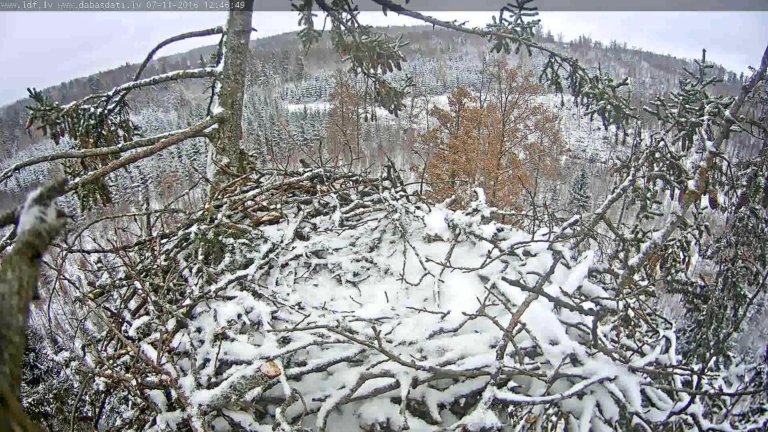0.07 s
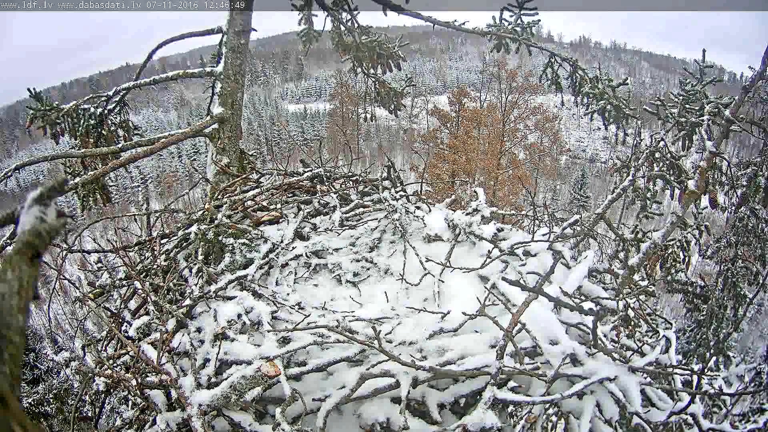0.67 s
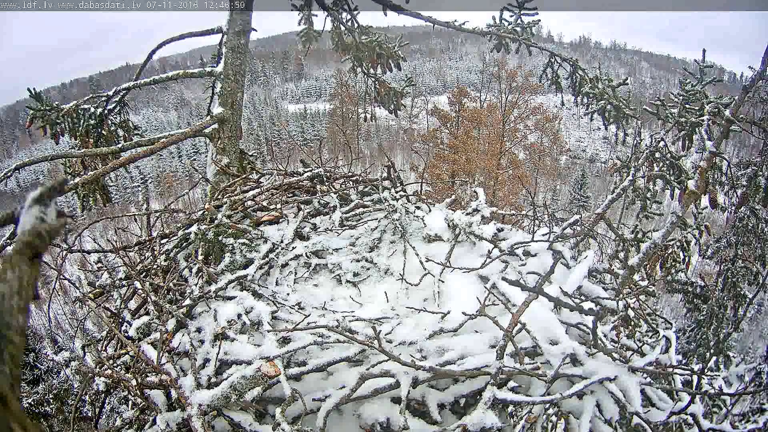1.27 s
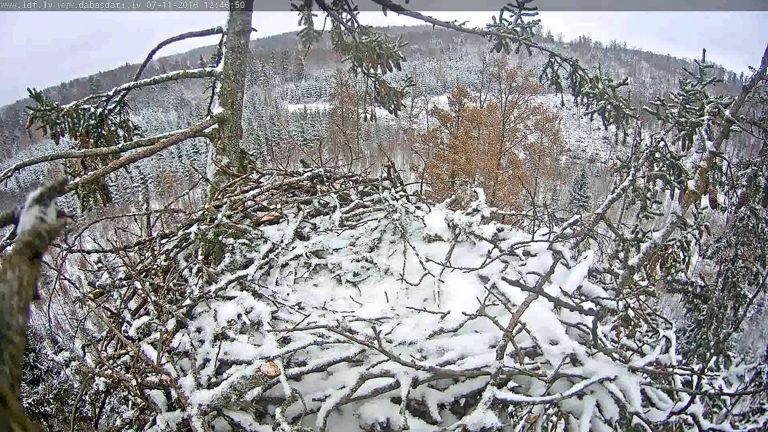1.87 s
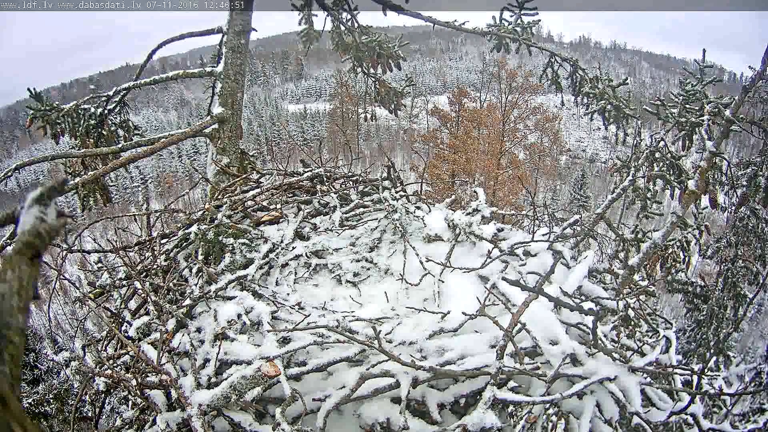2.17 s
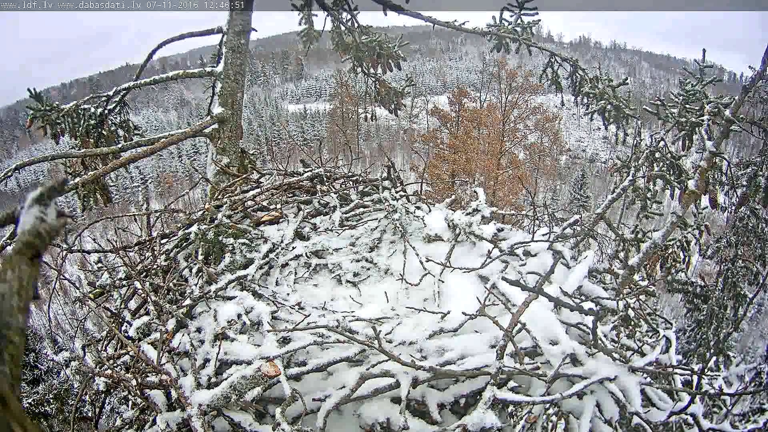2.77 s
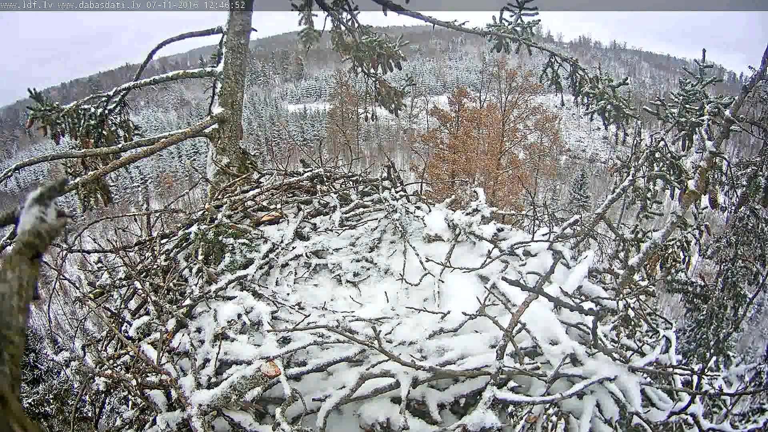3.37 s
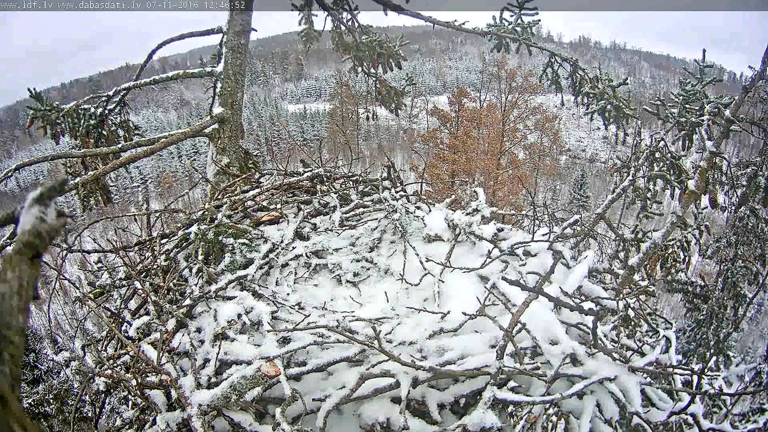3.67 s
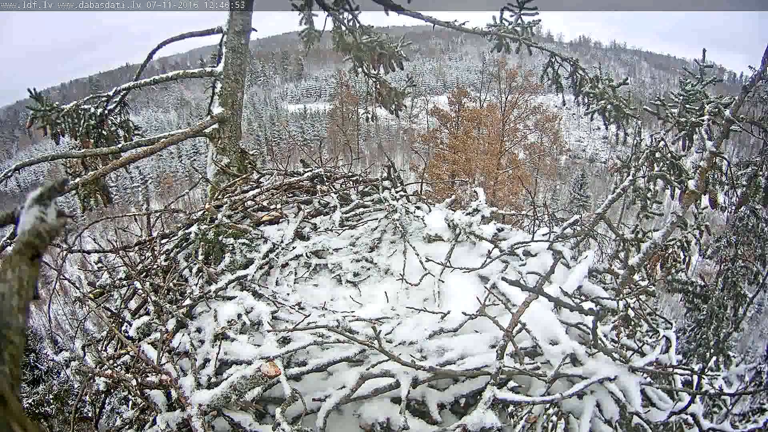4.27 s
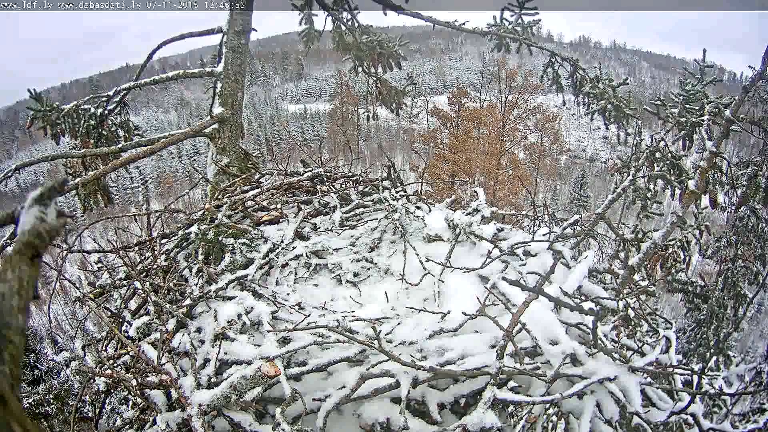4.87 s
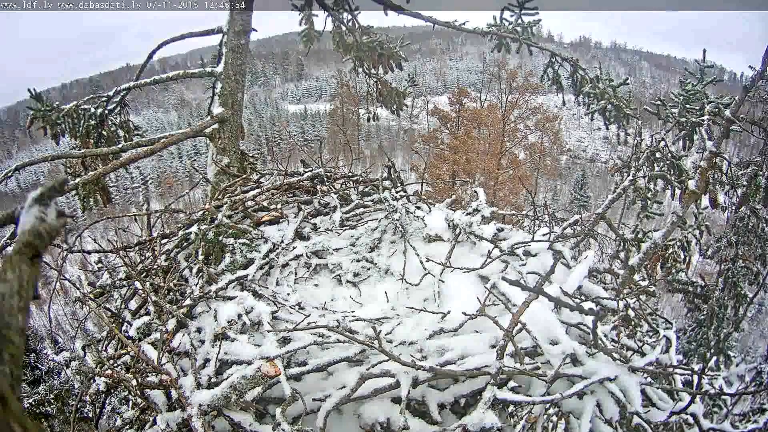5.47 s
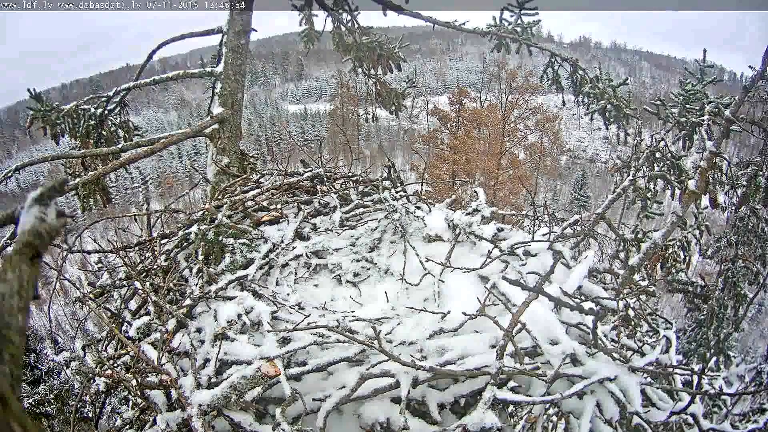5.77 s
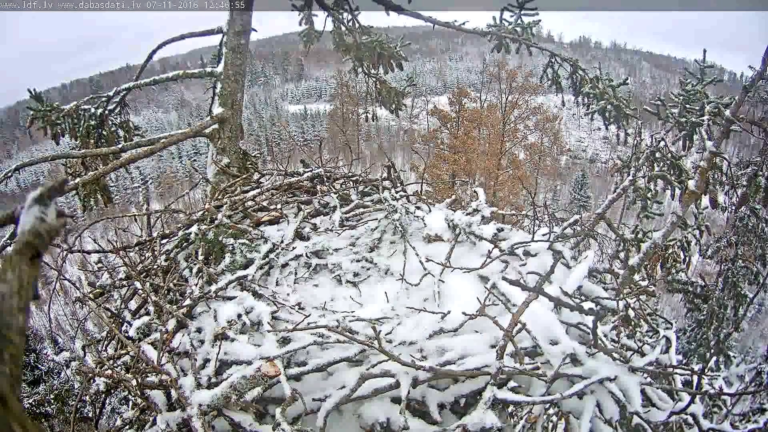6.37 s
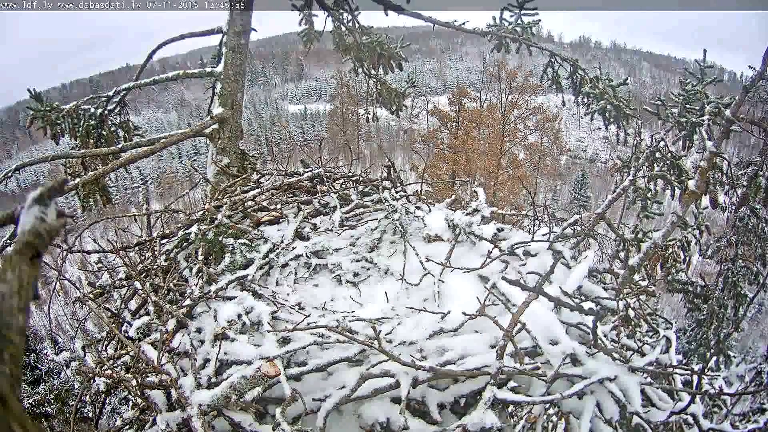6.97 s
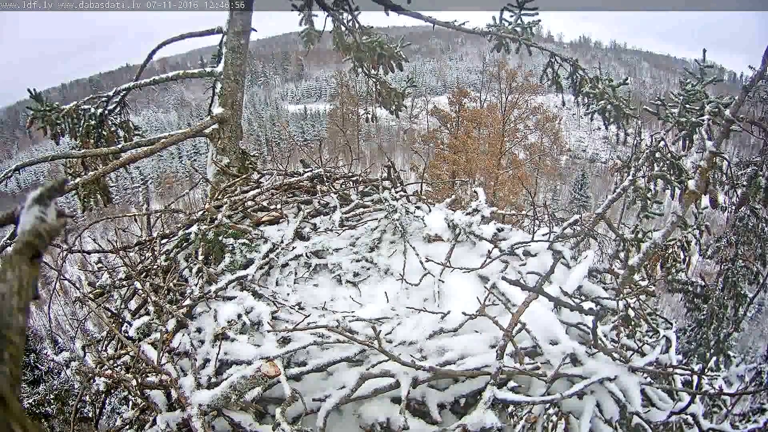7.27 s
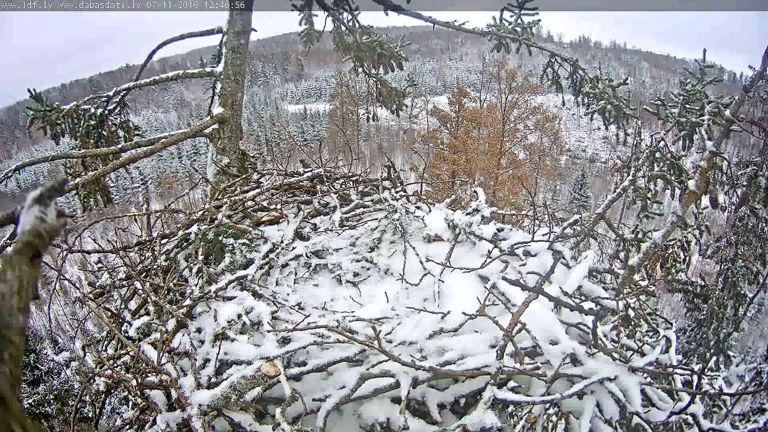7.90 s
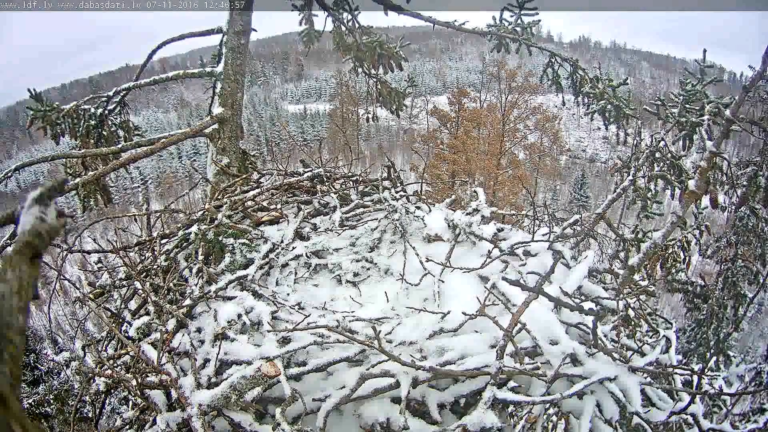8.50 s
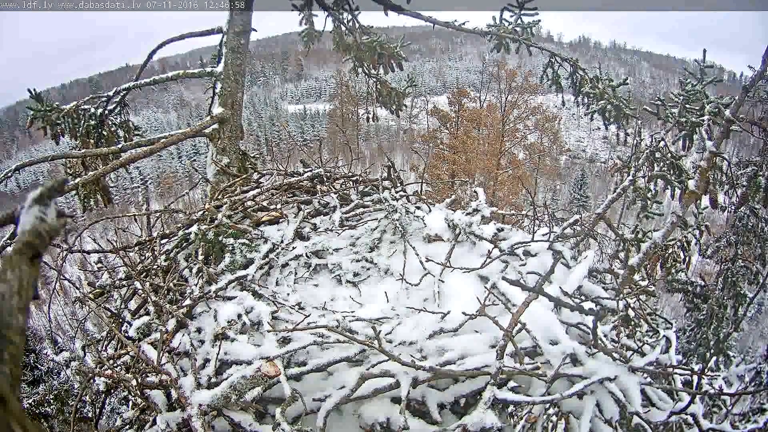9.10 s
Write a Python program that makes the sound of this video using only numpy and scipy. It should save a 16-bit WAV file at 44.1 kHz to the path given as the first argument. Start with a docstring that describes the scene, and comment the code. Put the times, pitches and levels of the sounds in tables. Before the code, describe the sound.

Fine snow patters and ticks on a microphone housing at a treetop nest, with small plops on nearby twigs. Light wind rumbles and thumps softly over a steady hiss with a faint whine. About three and a half seconds in, a distant buzzard mews once, a falling whistle that turns hoarse and echoes off the wooded slope. The wind then swells briefly and eases as the snow keeps ticking.

```python
"""Light wind rumbles, murmurs and thumps at a treetop nest, over a camera's hiss, flutter and faint whine.
Snow patters and ticks on the microphone housing and plops on twigs: each grain makes what it hits ring.
About 3.5 s in, a far-off buzzard mews once, a whistle that leaps up, sinks and turns hoarse.
The trees of the snowy slope throw the call back.
The camera turns weak bass down, and its gain control dips after loud peaks."""
import sys
import numpy as np
from scipy import signal
from scipy.fft import rfft, irfft
from scipy.io import wavfile
from scipy.ndimage import uniform_filter1d

SR = 44100
rng = np.random.default_rng(int(sys.argv[2]) if len(sys.argv) > 2 else 0)


def waveform_to_disk(signal):
    """Save audio, clipped to [-1, 1], as 16-bit WAV at the path in sys.argv[1]."""
    frames = np.transpose(np.atleast_2d(signal))
    scaled = np.clip(frames, -1, 1) * 32767
    samples = np.round(scaled).astype(np.int16)
    wavfile.write(sys.argv[1], SR, samples)


N = 407484
TIME = np.arange(N) / SR


def gain_of(db):
    """Turns decibels into a number to multiply by."""
    return 10 ** (np.asarray(db) / 20)


def unit_rms(x):
    """Scales x so that its average strength (rms) is 1."""
    return x / np.sqrt(np.mean(x ** 2) + 1e-20)


def level_at(spectrum, hz):
    """Looks up the level at hz in a table of frequencies and levels."""
    f, db = np.transpose(spectrum)
    return np.interp(np.log(hz + 1), np.log(f + 1), db)


def coloured_noise(spectrum):
    """Noise of rms 1 with the tone colour given by a table."""
    gain = gain_of(level_at(spectrum, np.fft.rfftfreq(N, 1 / SR)))
    return unit_rms(irfft(rfft(rng.standard_normal(N)) * gain, N))


def wander(hz):
    """A random wobble of rms 1, with up to about hz swings a second."""
    keep_slow = np.exp(-(np.fft.rfftfreq(N, 1 / SR) / hz) ** 2)
    return unit_rms(irfft(rfft(rng.standard_normal(N)) * keep_slow, N))


def add(mix, s, sound):
    """Mixes a sound in, starting at s seconds."""
    part = mix[round(s * SR):][:len(sound)]
    part += sound[:len(part)]


def ring(hz, rise_s):
    """The note of a tapped object: it swells for rise_s and dies within milliseconds."""
    t = TIME[:SR // 50]
    return t / rise_s * np.exp(1 - t / rise_s) * np.sin(2 * np.pi * hz * t)


# How hard the wind blows on the microphone: t/s, level/dB
GUSTS = [(0.3, -52), (0.8, -54), (2.9, -49.5), (3.6, -47), (4.1, -37), (4.55, -35), (5.25, -42.5),
         (5.55, -36), (6.0, -44), (6.3, -42.5), (7.6, -46.5), (8.2, -44), (9.0, -41)]
# Tone colour of the eddies, the swirls in the air: f/Hz, level/dB
EDDY_COLOUR = [(30, -14), (70, -2), (105, -2), (150, -2.5), (220, -10), (350, -15), (700, -28), (2000, -55)]
# Tone colour of the deep rumble: f/Hz, level/dB
RUMBLE_COLOUR = [(3, 4), (18, 6.5), (40, 4.5), (62, 0.5), (80, -13), (130, -33), (400, -46)]


def wind(unsteady_db=1.1, rumble_db=-33, rumble_follows=0.14, lumps_db=10.5, eddy_top_hz=300):
    """Eddies hit the microphone: brief lumps, each in its own narrow part of the bass, over a rumble."""
    gust_db = np.interp(TIME, *np.transpose(GUSTS)) + unsteady_db * wander(11)
    hz, _, bands = signal.stft(rng.standard_normal(N), SR, nperseg=2048, noverlap=1536)
    lumps = uniform_filter1d(rng.standard_normal(bands.shape), size=3, axis=0)  # blur across pitch
    lumps = unit_rms(uniform_filter1d(lumps, size=6, axis=1))  # blur across time
    depth_db = lumps_db / (1 + (hz / eddy_top_hz) ** 2)
    bands *= gain_of(level_at(EDDY_COLOUR, hz)[:, None] + depth_db[:, None] * np.minimum(lumps, 1.2))
    eddies = unit_rms(signal.istft(bands, SR, nperseg=2048, noverlap=1536)[1][:N])
    swell_db = rumble_follows * (gust_db - gust_db.mean())  # large eddies only partly follow the gusts
    return gain_of(gust_db) * eddies + gain_of(rumble_db + swell_db) * coloured_noise(RUMBLE_COLOUR)


# Brief dropouts in the low murmur: t/s, half length/s
DROPOUTS = [(0.272, .03), (0.532, 0.064), (0.822, 0.033), (1.175, 0.037), (1.365, 0.032), (1.704, .018),
            (1.92, .018), (2.165, 0.015), (2.228, 0.031), (2.745, .03), (3.175, 0.023), (3.328, 0.03),
            (6.027, 0.052)]
# Tone colour of the low murmur: f/Hz, level/dB
MURMUR_COLOUR = [(120, -15), (165, -7.5), (200, -0.5), (260, -3), (360, -9.5), (600, -32.5)]


def murmur(level_db=-45.5, follows=0.16, flutter_db=2.5, dropout_db=-20):
    """A low murmur that grows with the gusts. Now and then it cuts out for a moment and comes back."""
    gust_db = np.interp(TIME, *np.transpose(GUSTS))
    dropout = sum(np.exp(-((TIME - s) / half_s) ** 4) for s, half_s in DROPOUTS)
    db = level_db + follows * (gust_db - gust_db.mean()) + flutter_db * wander(14) + dropout_db * dropout
    return gain_of(db) * coloured_noise(MURMUR_COLOUR)


# Tone colour of the amplifier's hiss: f/Hz, level/dB
HISS_COLOUR = [(30, -27), (220, -1.5), (340, 10), (600, 7), (1500, 9.5), (3200, 2.5), (4500, 0.5),
               (7000, 0), (13000, -0.4), (14000, -1)]
# The thin tones of the camera's whine: f/Hz, level/dB
WHINE_TONES = [(4000, -66), (6000, -70)]


def camera_noise(hiss_db=-38, frame_hz=30.7, flutter_db=-38, bump_db=-22.5, bump_share=0.25):
    """Amplifier hiss, a thin whine, and a flutter at the frame rate with a larger bump in some frames."""
    frame = frame_hz * TIME
    swing = np.cos(2 * np.pi * frame)
    has_bump = (rng.random(int(frame[-1]) + 1) < bump_share)[frame.astype(int)]
    flutter = -gain_of(flutter_db) * swing + gain_of(bump_db) * has_bump * (1 - swing) / 2
    whine = sum(np.sqrt(2) * gain_of(db) * np.sin(2 * np.pi * hz * TIME) for hz, db in WHINE_TONES)
    return gain_of(hiss_db) * coloured_noise(HISS_COLOUR) + flutter + whine


# How strongly the microphone housing rings at each pitch: f/Hz, level/dB
HOUSING_COLOUR = [(150, -25), (330, -13.5), (620, -3.5), (780, -10), (950, -6), (1230, -3), (1580, -12.5),
                  (1800, -4), (2020, -4.5), (2170, 3), (2470, 2), (2650, -8.5), (2900, -7), (3300, -10.5),
                  (3700, -20), (6000, -54.5)]


def snow_patter(grains_per_s=1300, spread_db=1, level_db=-38.5, flurry_db=1.4):
    """Countless fine grains of uneven size hit the housing and blur into a soft crackle."""
    size = gain_of(spread_db * np.minimum(rng.exponential(1, N), 3.5)) * rng.choice([-1, 1], N)
    grains = size * (rng.random(N) < grains_per_s / SR)
    log_gain = np.log(gain_of(level_at(HOUSING_COLOUR, abs(np.fft.fftfreq(2048, 1 / SR)))))
    one_tap = np.fft.ifft(np.exp(np.conj(signal.hilbert(log_gain)))).real  # rings only after the hit
    crackle = unit_rms(signal.oaconvolve(grains, one_tap)[:N])
    return gain_of(level_db + flurry_db * wander(20)) * crackle


# Snow landing on the nearest twigs: t/s, level/dB, f/Hz
NEAR_PLOPS = [(0.174, -28, 1080), (0.796, -30, 900), (1.548, -28.5, 1210), (2.033, -25, 1055),
              (2.061, -25, 1300), (2.571, -30, 1340), (2.935, -26, 980), (3.123, -28, 1470),
              (3.377, -26, 1220), (6.679, -26, 1090), (7.379, -32, 885), (8.358, -30, 1090),
              (8.368, -26, 1120), (8.638, -28.5, 1300)]


def twig_plops(ring_s=0.002, count=900, faint_db=-33, low_hz=720, high_hz=3350, housing_share=0.5):
    """Snow taps a short note from each twig: a few near ones, many faint ones coloured by the housing."""
    out = np.zeros(N)
    for s, db, hz in NEAR_PLOPS:
        add(out, s, gain_of(db) * ring(hz, ring_s))
    for (when, twig), size_db in zip(rng.random((count, 2)), rng.standard_normal(count).clip(-2, 2)):
        hz = low_hz * (high_hz / low_hz) ** twig
        db = faint_db + size_db + housing_share * level_at(HOUSING_COLOUR, hz)
        add(out, when * TIME[-1], gain_of(db) * ring(hz, ring_s))
    return out


# The largest grains on the housing; the rows at 5.6995 s and 5.706 s are the bounce and after-rattle of the
# loudest one at 5.6974 s: t/s, level/dB, f/Hz, wall note against hollow note/dB, contact/s
BIG_GRAINS = [(0.1164, -26, 2200, -10, .0006), (0.3793, -28, 2430, -18, .001),
              (.6594, -25, 2240, -18, .0016), (0.7324, -22.5, 2380, -20, 0.0014),
              (0.7517, -22, 2270, -19, 0.00087), (1.6692, -25, 2310, -14, 0.0013),
              (1.7093, -21, 2200, -18, 0.001), (2.133, -20.5, 2370, -9, 0.001),
              (2.2209, -25, 2300, -18, .0016), (2.256, -22, 2260, -14, 0.002),
              (2.4787, -23, 2470, -6, .0006), (2.5417, -23.5, 2360, -16, .0014),
              (2.6289, -25, 2420, -20, 0.0018), (2.642, -22.5, 2280, -20, 0.0021),
              (3.212, -22, 2250, -22, 0.0019), (3.2466, -29, 2240, -18, 0.00098),
              (3.2657, -21, 2310, -20, 0.0022), (3.341, -22, 2220, -10, 0.0014),
              (3.397, -23, 2230, -15, .0013), (4.3135, -24, 2320, -14, 0.0014),
              (4.37, -20, 2250, -8, 0.00082), (4.3754, -22, 2400, -18, 0.0017),
              (4.5203, -23, 2400, 5, 0.0011), (4.6339, -18.5, 2250, -18, 0.00084),
              (4.678, -18, 2250, -9, 0.0022), (4.775, -19.5, 2200, -9, .0007),
              (4.9016, -21, 2280, -18, 0.00091), (5.129, -21, 2400, -6.5, .001),
              (5.4, -16.5, 2300, -9.5, 0.0011), (5.6974, -10, 2180, -23, 0.00071),
              (5.6995, -20, 2200, -19, 0.00095), (5.706, -24, 2750, -17, 0.0005),
              (5.9418, -25, 2340, -14, .001), (5.9542, -23, 2250, -11, 0.00064),
              (5.959, -17, 2270, -12, .0007), (5.9906, -20.5, 2400, -18.5, 0.0018),
              (6.176, -18, 2210, -8, .0007), (6.4382, -21, 2310, -8, .0007),
              (6.974, -20.5, 2200, -16, 0.00077), (7.0142, -23, 2240, -18, 0.001),
              (7.0389, -23.5, 2220, -16, .0012), (7.1203, -24, 2290, -16, .0014),
              (7.1641, -25, 2180, -16, 0.0013), (7.5658, -22, 2440, -19, 0.00079),
              (8.254, -24.5, 2300, -16, 0.0016), (8.2702, -25, 2220, -14, 0.0011),
              (8.4193, -25, 2190, -12, 0.00087), (8.5675, -23, 2340, -16, .001),
              (9.1556, -25, 2500, -16, 0.00093)]
# Tone colour of a grain shattering: f/Hz, level/dB
RATTLE_COLOUR = [(200, -3), (1200, -5), (2300, 1), (3100, -1), (3800, -13), (8000, -38)]


def snow_ticks(wall_hz=1120, wall_s=0.001, hollow_hz=2300,
               small_count=28, small_db=-27, small_wall_db=-12, small_contact_s=0.0013):
    """A grain rings the housing's hollow and wall, then shatters. Hard grains click; soft ones tap."""
    out, t = np.zeros(N), TIME[:SR // 50]
    rattle = coloured_noise(RATTLE_COLOUR)
    rattle_fade = gain_of(-9) * np.exp(-t / 0.0008) + gain_of(-16.5) * np.exp(-t / 0.004)  # crack + tail
    grains = list(BIG_GRAINS)
    for when, size, place in rng.uniform(-1, 1, (small_count, 3)):  # smaller grains land at random
        s = (when + 1) / 2 * TIME[-len(t) - 1]
        hz = hollow_hz * (1 + 0.042 * place)
        grains.append((s, small_db + 2.5 * size, hz, small_wall_db, small_contact_s))
    for (s, db, hz, wall_db, contact_s), detune in zip(grains, rng.uniform(-1, 1, len(grains))):
        wall_gain = gain_of(wall_db)
        wall = wall_gain * ring(wall_hz * (1 + 0.19 * detune), wall_s)
        tick = (ring(hz, contact_s) + wall) / np.hypot(1, wall_gain)
        shatter = rattle_fade * rattle[round(s * SR):][:len(t)]
        add(out, s, gain_of(db) * (tick + shatter))
    return out


# Single eddies that thump the microphone: t/s, level/dB, f/Hz
THUMPS = [(.13, -35.5, 152), (.9, -35.5, 174), (2.83, -37, 180), (2.945, -37, 150), (3.52, -37, 132),
          (3.615, -38, 160), (0.639, -36, 141.5), (0.759, -36, 148), (1.12, -35, 136), (1.21, -37, 148),
          (1.41, -27, 75), (1.68, -22.5, 62), (1.76, -37.5, 144), (1.941, -34, 156), (2.07, -34, 198),
          (2.43, -38, 155), (2.496, -27.5, 84.5), (2.68, -34.5, 147), (3.15, -32.5, 138),
          (3.242, -31, 79.4), (3.421, -34, 208), (3.8, -32.5, 150), (4.09, -30, 90.8), (4.16, -28.5, 115),
          (4.3, -28, 105), (4.53, -28, 112), (4.64, -28.5, 95), (4.4, -26.5, 131), (4.44, -27, 101.4),
          (4.765, -28.5, 107), (5.07, -35, 163), (5.446, -25.5, 97), (5.694, -24.5, 94.5),
          (5.79, -33.5, 125), (6.17, -29.5, 123.4), (6.24, -30, 104), (6.43, -32, 153), (6.53, -34.5, 143),
          (6.834, -32, 99), (7.255, -27.5, 110.4), (7.737, -30, 83.5), (8.119, -32, 157), (8.249, -31, 162),
          (8.48, -36, 150), (8.579, -36.5, 169), (8.788, -30, 101), (8.88, -35.5, 264), (9.051, -31, 159)]


def wind_thumps(trim_db=-2, half_s=0.019):
    """A large eddy pushes on the microphone for a few swings."""
    out = np.zeros(N)
    t = TIME[:SR // 5] - TIME[SR // 10]  # zero in the middle of the thump
    for (s, db, hz), turn in zip(THUMPS, rng.random(len(THUMPS))):
        push = np.exp(-(t / half_s) ** 2) * np.sin(2 * np.pi * (hz * t + turn))
        add(out, s + t[0], gain_of(trim_db + db) * push)
    return out


# What the bird's throat lets through, mostly the tone at twice the pitch: f/Hz, level/dB
THROAT = [(850, -9), (1050, -24), (1260, -24), (1700, -8), (1850, 0), (2550, 0), (2800, -5.5), (3000, -24),
          (3800, -34.5), (5200, -46), (7000, -55)]
# Where the voice falters: t/s, half length/s, level change/dB, added roughness/0-1, pitch slip/Hz
VOICE_CRACKS = [(3.494, 0.005, 1, 0.4, 25), (3.563, 0.02, -3.5, 0.1, 0), (3.613, .003, -10, .2, -2),
                (3.628, 0.011, -7, 0.1, 0), (3.651, 0.016, -9, 0.35, -20.5),
                (3.688, 0.0257, -12, 0.97, -42), (3.758, 0.021, 2.5, 0.03, 0), (3.81, 0.017, -6, 0.56, 0),
                (3.853, 0.017, -2.5, 0.24, 7.5), (3.894, 0.02, -5, 0.8, 1), (3.94, 0.026, -2.5, .1, -15)]


def buzzard(start_s=3.462, length_s=0.63, loud_db=-19, jitter=0.0281, flutter_db=4.5, shimmer_db=0.2):
    """A whistle that leaps up, then sinks steadily as it fades, breaking hoarsely half way down."""
    leap_s, opening_hz, top_hz, sink_hz_per_s = 0.027, 1030, 1296, 780
    attack_s, attack_db, fade_db, release_db_per_s = 0.024, -14.5, -25.5, 400
    rough_leap, rough_clear, rough_tired = 0.5, 0.04, 0.45
    t = TIME - start_s
    leap = np.clip(t / leap_s, 0, 1)
    sinking_s = np.clip(t - leap_s, 0, 1)
    tired = np.minimum(sinking_s / (length_s - leap_s), 1)
    pitch = opening_hz + (top_hz - opening_hz) * leap ** 1.29 - sink_hz_per_s * sinking_s
    level_db = loud_db + attack_db * np.maximum(1 - t / attack_s, 0) + fade_db * tired ** 1.76
    level_db -= release_db_per_s * np.maximum(t - length_s, 0)
    rough = np.where(leap < 1, rough_leap, rough_clear + (rough_tired - rough_clear) * tired)
    for s, half_s, change_db, hoarse, slip_hz in VOICE_CRACKS:
        crack = np.exp(-((TIME - s) / half_s) ** 2)
        level_db += change_db * crack
        rough += hoarse * crack
        pitch += slip_hz * crack
    pitch *= 1 + jitter * rough * wander(138)
    level_db += flutter_db * rough * wander(130)
    level_db += shimmer_db * wander(60)  # moving air makes a far voice shimmer
    phase = 2 * np.pi * np.cumsum(pitch) / SR
    voice = sum(gain_of(level_at(THROAT, k * pitch)) * np.sin(k * phase) for k in range(1, 5))
    return np.sqrt(2) * gain_of(level_db) * voice


# First echoes from the nearest trees, timed from the call: t/s, level/dB
TREE_ECHOES = [(.032, -20), (0.076, -25), (.13, -15), (.178, -21), (.255, -20)]
# What the trees send back; their needles soak up the highest notes: f/Hz, level/dB
ECHO_COLOUR = [(1000, 0), (2380, 0), (2480, -3), (2600, -8), (4000, -10)]


def forest_echo(call, fade_60db_s=1.25, build_s=0.12, tail_db=-14.5):
    """A few single echoes, then a wash from many trunks that builds up and dies away."""
    t = TIME[:2 * SR]
    build_up = 1 - np.exp(-(t / build_s) ** 2)
    wash = rng.standard_normal(len(t)) * gain_of(-60 * t / fade_60db_s) * build_up
    echoes = gain_of(tail_db) * wash / np.linalg.norm(wash)
    for delay_s, db in TREE_ECHOES:
        add(echoes, delay_s, gain_of([db]))
    needles = gain_of(level_at(ECHO_COLOUR, np.fft.rfftfreq(len(t), 1 / SR)))
    echoes = irfft(rfft(echoes) * needles, len(t))
    return signal.fftconvolve(call, echoes)[:N]


# The second whistle that joins when the voice breaks: t/s, f/Hz, level/dB
SECOND_WHISTLE = [(3.6, 2520, -50), (3.617, 2500, -29), (3.643, 2425, -23), (3.66, 2400, -30),
                  (3.68, 2435, -34), (3.7, 2425, -28), (3.73, 2380, -29), (3.758, 2370, -29),
                  (3.785, 2335, -37), (3.84, 2270, -38), (3.95, 2060, -48)]


def second_whistle(jitter=0.01, flutter_db=2):
    """The other side of the bird's voice box sounds a bit higher and beats hoarsely against the first."""
    s, hz, db = np.transpose(SECOND_WHISTLE)
    pitch = np.interp(TIME, s, hz) * (1 + jitter * wander(122.5))
    sounding = (TIME > s[0]) & (TIME < s[-1])
    gain = gain_of(np.interp(TIME, s, db) + flutter_db * wander(120)) * sounding
    return np.sqrt(2) * gain * np.sin(2 * np.pi * np.cumsum(pitch) / SR)


def scene():
    """Wind, camera noise and snow, with the buzzard's call and its echoes, in one channel."""
    call = buzzard() + second_whistle()
    snow = snow_ticks() + twig_plops() + snow_patter()
    return (call + forest_echo(call) + snow + wind() + murmur() + wind_thumps() + camera_noise())[None]


def suppress_weak_bass(x, depth_db=-9.5, below_db=-6, low_hz=120, top_hz=280):
    """The camera turns a band of bass down whenever it falls well below its usual level."""
    hz, _, bands = signal.stft(x, SR, nperseg=2048, noverlap=1536)
    power = uniform_filter1d(uniform_filter1d(abs(bands) ** 2, size=3, axis=0), size=3, axis=1)
    threshold = np.median(power, axis=1, keepdims=True) * gain_of(below_db) ** 2 + 1e-20
    weak = 1 / (1 + (power / threshold) ** 4)
    bass = (hz > low_hz) & (hz < top_hz)
    bands *= gain_of(depth_db * weak * bass[:, None])
    return signal.istft(bands, SR, nperseg=2048, noverlap=1536)[1][:N]


def record(dry, threshold_db=-20, squeeze=0.17, recover_db_per_s=2.5, bias=0.662, cutoff_hz=14050):
    """The camera lowers weak bass, dips its gain after sharp peaks and cuts off the highest treble."""
    sharp = dry[0] - uniform_filter1d(dry[0], size=90)  # the gain control ignores the rumble
    excess_db = np.maximum(20 * np.log10(abs(sharp) + 1e-6) - threshold_db, 0)
    recovery_db = TIME * recover_db_per_s
    dip_db = np.maximum.accumulate(squeeze * excess_db + recovery_db) - recovery_db
    biased = suppress_weak_bass(dry[0])[None] + bias  # a steady offset that dips along with the sound
    dipped = biased * gain_of(-uniform_filter1d(dip_db, size=180))
    lowpass = signal.firwin(801, cutoff_hz, window=("kaiser", 9), fs=SR)
    padded = np.pad(dipped, ((0, 0), (len(lowpass) // 2,) * 2), mode="edge")
    return signal.oaconvolve(padded, lowpass[None], "valid")


dry = scene()
out = record(dry)
waveform_to_disk(out)
```